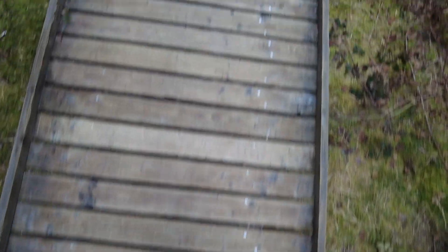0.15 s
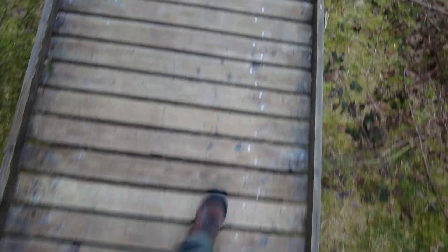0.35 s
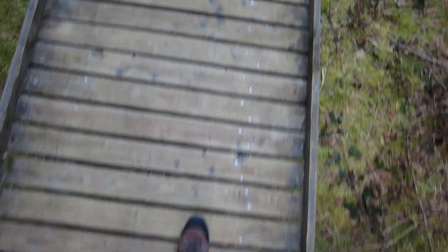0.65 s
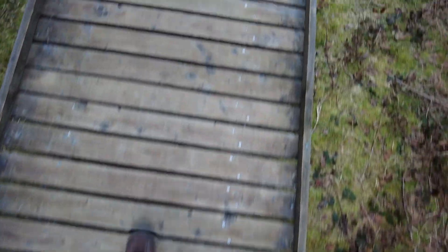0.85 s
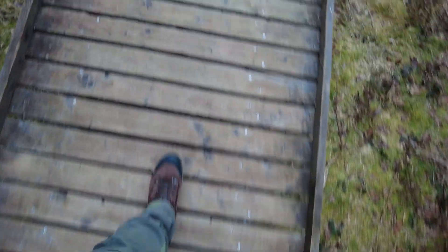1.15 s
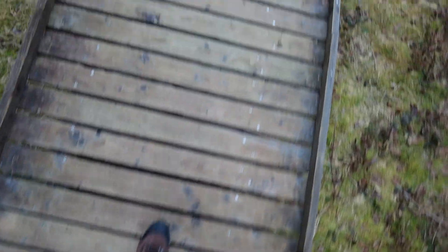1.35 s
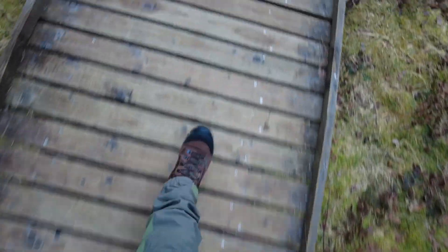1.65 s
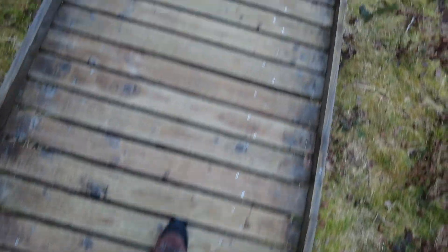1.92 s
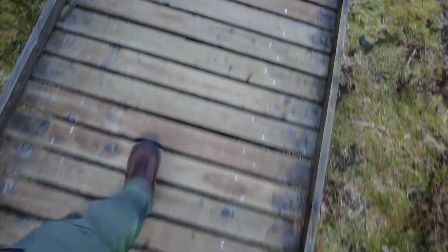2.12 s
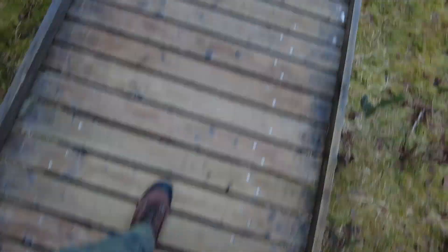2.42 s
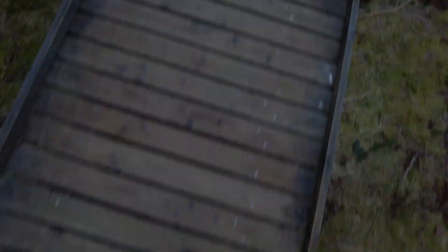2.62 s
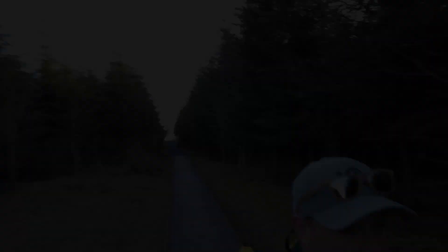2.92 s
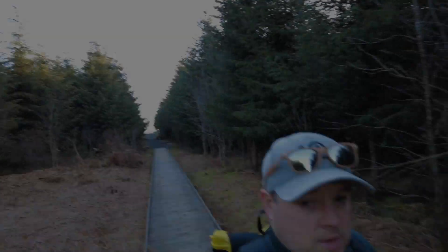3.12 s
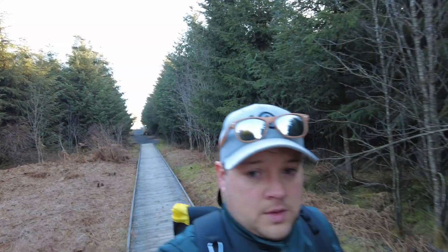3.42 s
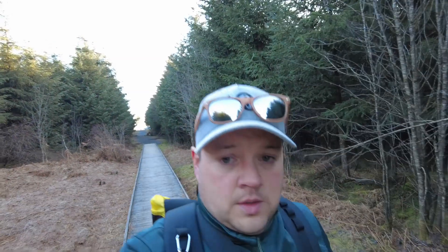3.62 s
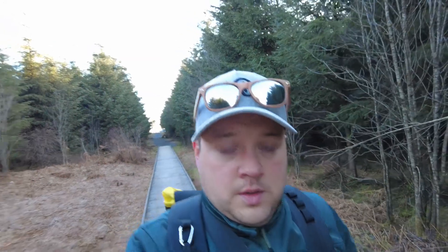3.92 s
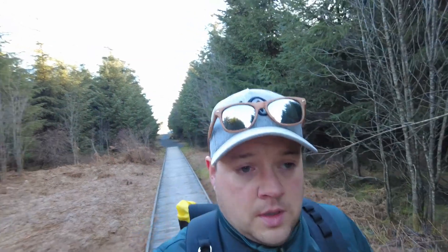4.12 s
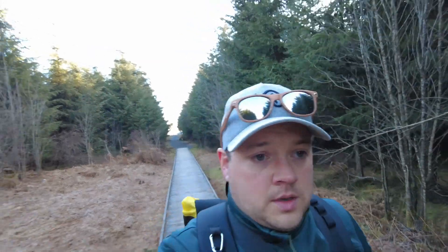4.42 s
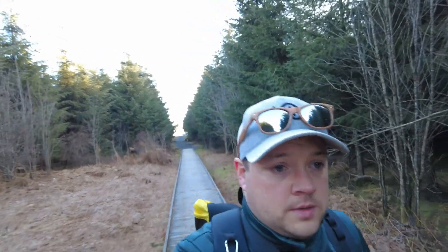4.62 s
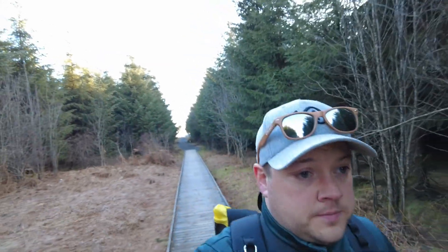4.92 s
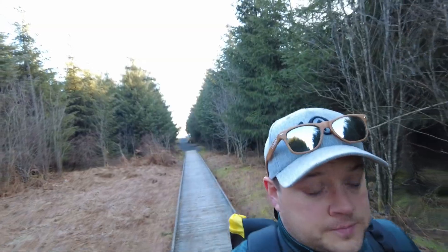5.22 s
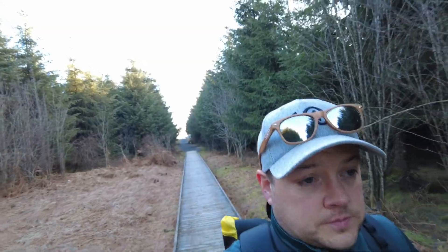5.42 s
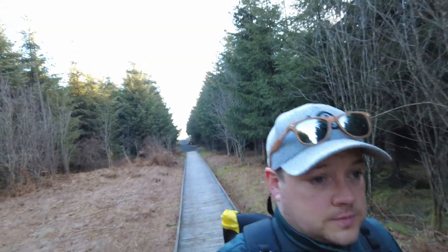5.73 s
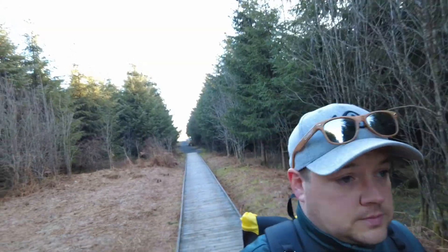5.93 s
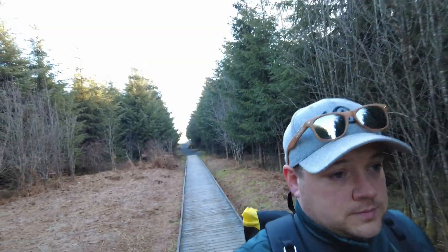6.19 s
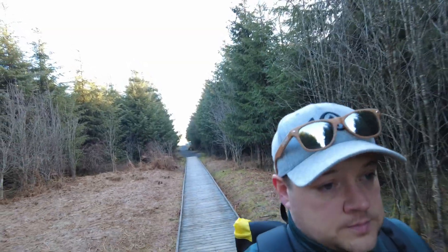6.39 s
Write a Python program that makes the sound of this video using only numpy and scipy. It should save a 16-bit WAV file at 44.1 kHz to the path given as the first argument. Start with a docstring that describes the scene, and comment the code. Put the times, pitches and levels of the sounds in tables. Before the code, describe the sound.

From the start, boots walk along a wooden boardwalk close to the microphone, about one step every half second or so, over a soft hiss of air in the trees. Heels and toes knock the planks and set off low, hollow thumps in the beams. Clothes rustle with each stride, soles scuff, and grit and gear make small clacks. The strongest steps land at about 1.1, 1.8 and 2.4 seconds. At 2.5 seconds a finch gives one faint note. Just before 3 seconds the ring of the boards breaks off, and the steps continue a little lighter, with less rustle. After a few stray notes, the finch sings a swelling trill from about 4.2 seconds, then three slower calls between 4.9 and 5.5 seconds, softly echoing off to one side. A heavier, clattering step comes near 5.9 seconds, and the walking goes on until the end at about 6.5 seconds.

```python
"""Boots tramp along a wooden boardwalk in a quiet wood, heard close up through two microphone ports. From the
start, over a soft hiss of air, heels and toes knock the planks and set the beams swinging, while cloth rustles,
soles scuff and grit and gear clack. At 2.5 s a finch tries its first note; just before 3 s the scene changes:
all ringing and swishing still sounding breaks off, and the steps carry on. From about 4.2 s the finch sings a
swelling trill and three slower calls, smeared by the trees, and the boots tramp on to the end."""
import sys
import numpy as np
from scipy import signal
from scipy.fft import rfft, irfft
from scipy.io import wavfile
from scipy.ndimage import uniform_filter1d

SR = 44100
rng = np.random.default_rng(int(sys.argv[2]) if len(sys.argv) > 2 else 0)


def digitize_waveform(pressure):
    """Quantize a signal to 16-bit integers and store it at the path in sys.argv[1].

    Rows of a 2-D input are taken as channels; values are limited to [-1, 1].
    """
    field = np.atleast_2d(pressure).T
    bounded = np.clip(field, -1, 1)
    quanta = np.round(bounded * 32767).astype(np.int16)
    wavfile.write(sys.argv[1], SR, quanta)


N = 289109
BREAK_S = 2.932  # earlier footfalls and leg swings stop sounding here

# drift of the walker between the ports, scaled by each layer: time_s, left_lag_us
FACING = [(0, -49), (1.5, -40), (2.1, -58), (2.9, -41), (2.95, 18), (4, 48), (6.56, 66)]


def gain_of(db):
    """Decibels to gain."""
    return 10 ** (np.asarray(db) / 20)


def unit_rms(x):
    """Scales to rms 1."""
    return x / np.sqrt(np.mean(x ** 2) + 1e-20)


def curve_at(points, hz):
    """Reads a curve on a log-frequency axis."""
    point_hz, value = np.transpose(points)
    return np.interp(np.log(hz + 1), np.log(point_hz + 1), value)


def facing_lag_us(time_s):
    """The walker's left-port lag at a given time."""
    return np.interp(time_s, *np.transpose(FACING))


def add(mix, start_s, sound):
    """Mixes a sound in at its start time."""
    part = mix[..., round(start_s * SR):][..., :sound.shape[-1]]
    part += sound[..., :part.shape[-1]]


def ring(modes, t, tune, extra_db=0):
    """A struck body: one dying sine for each mode."""
    hz, db, t60 = np.transpose(modes)[:, :, None]
    return (gain_of(db + extra_db - 60 * t / t60) * np.sin(2 * np.pi * hz * tune * t)).sum(0)


def ports(left, right, pan_db, lag_us):
    """Places a sound by a small step in level and arrival time between the ports."""
    hz = np.fft.rfftfreq(len(left), 1 / SR)
    delay_s = 1e-4 + np.array([[lag_us], [-lag_us]]) * 1e-6 / 2
    delayed = rfft([left, right]) * np.exp(-2j * np.pi * hz * delay_s)
    return irfft(delayed, len(left)) * gain_of([[pan_db / 2], [-pan_db / 2]])


def textured_noise(spectrum, level_db, patchy_db, flicker_db):
    """Stereo noise with drifting patches of colour and a broadband flicker."""
    # how alike the two ports sound: frequency_hz, likeness (0 to 1)
    port_likeness = [(60, 0.95), (300, 0.77), (1000, 0.045), (3000, 0.81), (10000, 0.052)]
    frames, hz = N // 128 + 5, np.fft.rfftfreq(512, 1 / SR)[:, None]
    t = np.arange(frames) * 128 / SR
    left_re, left_im, apart_re, apart_im, patches = rng.standard_normal((frames, 257, 5)).T
    patches = unit_rms(uniform_filter1d(uniform_filter1d(patches, size=6, axis=0), size=16, axis=1))
    flicker = rng.exponential(1, frames) - 1
    alike = np.clip(curve_at(port_likeness, hz), 0, 1)
    lag = np.exp(2j * np.pi * hz * 1e-6 * facing_lag_us(t))
    left = left_re + 1j * left_im
    right = alike * left * lag + np.sqrt(1 - alike ** 2) * (apart_re + 1j * apart_im)
    colour = gain_of(curve_at(spectrum, hz) + patchy_db * patches + flicker_db * flicker)
    _, sound = signal.istft(np.array([left, right]) * colour, nperseg=512, noverlap=384)
    return gain_of(level_db) * unit_rms(sound[:, :N])


def low_noise(spectrum, level_db):
    """Shaped noise, nearly the same at both ports."""
    colour = gain_of(curve_at(spectrum, np.fft.rfftfreq(N, 1 / SR)))
    mid, side = irfft(rfft(rng.standard_normal((N, 2)).T) * colour, N)
    return gain_of(level_db) * unit_rms(mid + gain_of(-20) * np.array([side, -side]))


def swing_level_db(layer):
    """Envelope of "cloth" or "soles": a resting murmur plus a rise and fall for each leg swing."""
    # leg swings: peak_s, cloth_db, soles_db
    leg_swings = [(0.01, -40, -38.5), (0.25, -45.5, -38.5), (0.37, -74, -66), (0.48, -43, -67),
                  (0.69, -41.5, -37.5), (0.84, -66, -41.5), (1.142, -38, -35.5), (1.449, -43, -38.5),
                  (1.791, -35, -30), (2.25, -44.5, -40), (2.411, -38.5, -33.5), (2.62, -44, -40),
                  (2.87, -46, -38.5), (3.22, -54, -37.5), (3.77, -49, -39.5), (4.04, -48, -42),
                  (4.29, -48, -42), (4.84, -51.5, -39), (5.39, -47, -34.5), (5.881, -45.5, -31.5),
                  (6.43, -48, -37.5)]
    # murmur between swings, one row before the break and one after: cloth_db, soles_db
    resting = [(-53.5, -45.5), (-54.5, -45.5)]
    column, rise_db_per_s, fall_db_per_s = {"cloth": (0, 57, 42), "soles": (1, 157, 78)}[layer]
    t = np.arange(0, N / SR + .01, .004)
    power = gain_of(np.where(t < BREAK_S, resting[0][column], resting[1][column])) ** 2
    for peak_s, *levels_db in leg_swings:
        slope_db = np.where(t < peak_s, rise_db_per_s * (t - peak_s), fall_db_per_s * (peak_s - t))
        same_side_of_break = (t < BREAK_S) == (peak_s < BREAK_S)
        power += gain_of(levels_db[column] + slope_db) ** 2 * same_side_of_break
    return np.interp(np.arange(N) / SR, t, 10 * np.log10(power))


def air():
    """Air in the trees lays a soft hiss under everything."""
    # colour of the hiss: frequency_hz, density_db
    hiss = [(120, -62), (200, 5.5), (683, -12), (867, -4), (1270, -2), (2290, -3.5), (3070, 0), (3560, -17),
            (4950, -5.5), (15100, -45), (16000, -38)]
    return textured_noise(hiss, level_db=-54.5, patchy_db=5.5, flicker_db=0)


def cloth():
    """Clothes rustle brightly with each swing of a leg."""
    # colour of the rustle: frequency_hz, density_db
    rustle = [(880, -39), (1500, 4.5), (2270, -3), (3150, 0), (3880, -3), (6310, -3), (15100, -15.5),
              (16000, -13.5)]
    return textured_noise(rustle, swing_level_db("cloth"), patchy_db=2, flicker_db=2)


def soles():
    """Soles brush the planks in quick, dull scuffs."""
    # colour of the scuff: frequency_hz, density_db
    scuff = [(88, 2), (150, -12.5), (251, 0), (322, 2), (419, -2), (518, 0), (1100, -6.5), (1340, -3),
             (2300, -16.5), (3500, -18.5), (4550, -17), (7700, -120)]
    return textured_noise(scuff, swing_level_db("soles"), patchy_db=4, flicker_db=0.5)


def deck():
    """Planks rumble and beams sway under the walker's weight between the blows."""
    # weight on the deck: time_s, rumble_db, sway_db
    weight = [(0.0, -25, -51), (0.42, -57, -36.5), (1.26, -50, -41.5), (2.09, -55.5, -40.5),
              (2.46, -53, -40.5), (4.06, -67, -50.5), (5.42, -64, -42), (5.77, -68, -51.5),
              (5.94, -29.5, -43), (6.34, -75, -49.5), (6.55, -51, -44)]
    # colour of the plank rumble: frequency_hz, density_db
    rumble = [(60, -43), (80, 15), (105, 13), (140, -0.5), (200, 3), (300, -36)]
    # colour of the beam sway: frequency_hz, density_db
    sway = [(8, -12), (22, 10), (42, 0), (62, -5.5), (85, -36)]
    time_s, *levels_db = np.transpose(weight)
    rumble_db, sway_db = [np.interp(np.arange(N) / SR, time_s, db) for db in levels_db]
    return low_noise(rumble, rumble_db) + low_noise(sway, sway_db)


def footfalls():
    """Each blow is a short uneven contact that rings the plank, then the weight swings the beam."""
    # heel and toe blows: start_s, knock_db, thump_db, beam_db, struck_hz (before tuning),
    # tuning_ratio, falloff_db_per_octave (around the struck pitch)
    blows = [(0.004, -18, -49, -11.5, 250, 0.98, -8), (0.102, -15, -21.5, -16, 170, 1.11, -10),
             (0.356, -30.5, -45, -50, 330, 0.68, -19), (0.414, -28, -52, -52, 196, 0.46, -11),
             (0.573, -14.5, -21, -15, 165, 0.96, -8), (0.7, -13, -20, -16, 420, 1.14, -3),
             (1.134, -9.5, -21, -7.5, 900, 1.07, -8), (1.152, -14.5, -14, -37, 186, 1.13, -4),
             (1.263, -9, -16, -19, 320, 1.12, -10), (1.74, -16, -23, -42, 198, 1.03, -9),
             (1.771, -7.5, -30, -27, 355, 0.95, -19), (2.3713, -1, -13, -6.5, 794, 1.075, -9),
             (2.493, -17.5, -28, -23, 224, 1.14, -14), (2.615, -23.5, -56, -25.5, 510, 1.27, -19),
             (2.919, -10, -60, -48, 287, 0.95, -3.5), (3.092, -14, -33, -53, 276, 0.93, -7),
             (3.22, -19.5, -40, -52, 337, 0.92, -30), (3.632, -20.5, -20.5, -20.5, 210, 0.93, -3),
             (3.735, -23.5, -32.5, -20, 335, 1.07, -1), (4.212, -17.5, -23.5, -21.5, 283, 1.06, -6),
             (4.321, -23.5, -38, -26, 295, 1.18, -23), (4.519, -26.5, -67, -37, 660, 1.26, -17),
             (4.766, -19, -20, -32, 355, 0.92, -27), (4.881, -26.5, -33.5, -27, 253, 0.9, -7),
             (5.3385, -15.5, -29, -19, 260, 0.95, -3), (5.41, -20, -29, -16.5, 307, 1, 0),
             (5.828, -9.5, -18, -40, 395, 1.07, -21), (5.845, -15.5, -32, -45, 338, 0.99, -12),
             (5.86, -16.5, -25, -36, 264, 1.03, -31), (5.878, -18, -30, -45, 298, 0.8, -9),
             (5.9, -14, -27, -23, 269, 1.03, -5), (5.948, -23.5, -28, -47, 334, 1.3, -9),
             (6.032, -25.5, -35, -51, 237, 0.977, -7), (6.413, -12, -31, -16.5, 180, 1.03, -20),
             (6.51, -21, -23.5, -25, 443, 0.74, -8)]
    # upper plank modes: pitch_hz, level_db, t60_s
    knock_modes = [(140, 4, 0.058), (180, -2, 0.1), (221, -2, 0.15), (264, -3, 0.16), (301, 2.5, 0.042),
                   (355, -1.5, 0.078), (476, 13, 0.024), (603, 4, 0.049), (690, -21, 0.033),
                   (940, -18, 0.017), (1200, 12.5, 0.011), (1670, 10.5, 0.016)]
    # low plank modes: pitch_hz, level_db, t60_s
    thump_modes = [(104.6, 5.5, 0.22), (134.9, 5.5, 0.12), (153.7, 1, 0.13)]
    # beam modes: pitch_hz, level_db, t60_s
    beam_modes = [(33.9, 1.8, 0.2), (42.1, 4.5, 0.29), (52.9, 3.1, 0.15)]
    contact_s, thump_rise_s, beam_rise_s = 0.0147, 0.022, 0.04
    out, t = np.zeros((2, N)), np.arange(SR // 2) / SR
    contact_t = t[:4000]
    for start_s, knock_db, thump_db, beam_db, struck_hz, tune, falloff_db in blows:
        roughness = 0.045 * rng.standard_normal(len(contact_t)) * np.exp(-contact_t / contact_s)
        contact = roughness - (contact_t == 0)
        contact = uniform_filter1d(np.roll(contact, 5), size=10)  # a rubber sole softens the edge
        detune = 1 + 0.052 * rng.standard_normal((len(knock_modes), 1))
        octaves_away = abs(np.log2(np.array(knock_modes)[:, :1] / struck_hz))
        plank = ring(knock_modes, t, tune * detune, falloff_db * octaves_away)
        knock = signal.oaconvolve(plank, contact)[:len(t)]
        knock = gain_of(knock_db) * knock / abs(knock).max()
        knock = ports(knock, knock, pan_db=0.76, lag_us=4 * facing_lag_us(start_s))
        thump = -ring(thump_modes, t, tune) * (1 - np.exp(-t / thump_rise_s))
        beam = ring(beam_modes, t, tune) * (1 - np.exp(-(t / beam_rise_s) ** 2))
        low = gain_of(thump_db) * thump + gain_of(beam_db) * beam
        width = gain_of(-23) * np.outer([1, -1], signal.hilbert(low).imag)  # slight phase spread
        gate = np.clip((BREAK_S - start_s - t) / .004, 0, 1) if start_s < BREAK_S else 1
        add(out, start_s, gate * (knock + low + width))
    return out


def stray_grit(per_s=5, length_ms=6, ring_ms=10):
    """Rows for faint clacks of loose grit: random in time, colour and pitch, as loud as the soles."""
    draws = rng.random((int(per_s * N / SR), 4))
    soles_db = swing_level_db("soles")
    return [(when * N / SR, soles_db[int(when * N)], length_ms, 12 * bright - 6,
             1300 + 2500 * pitch, ring_ms) for when, _, bright, pitch in draws]


def clacks():
    """Grit and gear clack in clusters of tiny impacts: bare treble ticks plus the ring of hard parts."""
    # clacks: start_s, level_db, length_ms, treble_db, struck_hz (rings 4 % flat), ring_t60_ms
    hits = [(0.039, -30, 3.5, 9, 2590, 10), (0.103, -22, 1.1, -26, 1570, 9.1),
            (0.25, -33.5, 41, -7, 2170, 4.1), (0.507, -26.5, 6.2, 1.5, 1990, 37),
            (0.573, -28.5, 2.2, -10, 1424, 40), (0.663, -24.5, 2.3, 6, 1970, 19),
            (0.697, -19.5, 3.6, 8.5, 1550, 8.2), (1.124, -30, 6.4, -8, 1140, 25),
            (1.1332, -5.5, 2.46, -6, 1330, 10.6), (1.209, -30.5, 3, 10, 2400, 10),
            (1.26, -14, 16.4, 7.5, 1705, 30), (1.668, -31.5, 16, -2, 1890, 10),
            (1.767, -16.5, 2.8, -1.5, 1780, 19), (2.412, -26, 24, -1, 1670, 32),
            (2.419, -26.5, 10, 9, 3250, 12), (2.48, -33, 37, 12, 1960, 11), (2.615, -33, 28, -12, 1670, 12),
            (2.737, -36.5, 4.3, 5, 1860, 12), (2.825, -28, 30, 8, 2270, 6.4),
            (2.847, -29.5, 58, 5, 2140, 7.6), (2.891, -13.5, 9.3, 3, 3020, 12),
            (3.2187, -16, 5, -2, 1970, 14), (3.649, -33.5, 13.6, -0.5, 2360, 7.8),
            (3.724, -30, 4.8, 4, 1960, 12), (3.734, -31, 6.7, 5, 2440, 10),
            (3.773, -22.5, 6.1, -5.5, 1760, 28), (3.792, -28.5, 3.6, -5, 2510, 4.5),
            (3.802, -30, 3.9, 2, 1990, 15), (4.021, -19.5, 12, -4.5, 1200, 16),
            (4.927, -35.5, 6.4, -2, 1750, 12), (5.279, -38.5, 16, 7, 1710, 18),
            (5.355, -32, 13, 4, 1820, 11), (5.382, -19, 5.6, 1, 2360, 26), (5.407, -22, 4.8, 0.5, 1705, 55),
            (5.8011, -25, 3.4, 0.5, 1350, 140), (5.822, -14.5, 5.7, 2.5, 2560, 6.3),
            (5.895, -16.5, 4.8, 3, 1747, 10), (6.035, -33.5, 7.5, 3, 2090, 11),
            (6.444, -27, 16, 0.5, 2080, 17)]
    # modes of the hard parts, retuned for each clack: pitch_hz, level_db, t60_s
    gear_modes = [(950, -6, .016), (1200, -1, .014), (1570, 0, .012), (1900, 1, .011), (2340, 2, .009),
                  (2960, 4, .009), (3600, 3, .007), (4650, 4, .006)]
    out, t = np.zeros((2, N)), np.arange(4096) / SR
    tick_highpass = signal.butter(2, 3000, "high", fs=SR)
    tick_lowpass = signal.butter(1, 13000, fs=SR)
    body_highpass = signal.butter(2, 800, "high", fs=SR)
    for start_s, level_db, length_ms, treble_db, struck_hz, ring_ms in hits + stray_grit():
        noise = rng.standard_normal((4, len(t)))
        centre, sides, grain = noise[0], noise[1:3], unit_rms(uniform_filter1d(noise[3], size=40))
        progress = t * 1000 / length_ms
        rise = np.minimum(progress / 0.22, 1)  # long crunches swell, short cracks snap
        crunch = rise * gain_of(-9 * progress ** 2 + 3.5 * grain)
        modes = np.array(gear_modes)
        struck = abs(np.log(modes[:, 0] / struck_hz)).argmin()
        modes[:, 0] *= struck_hz / modes[struck, 0]
        stretch = ring_ms / 1000 / modes[struck, 2]
        modes[struck, 2] *= stretch
        modes[struck, 1] -= 8 * np.log10(stretch)  # a longer ring starts softer
        octaves_away = abs(np.log2(modes[:, :1] / struck_hz))
        gear = ring(modes, t, tune=0.96, extra_db=-9 * octaves_away)
        drive = (centre + .45 * sides) * (crunch + rise * gain_of(-15 - 550 * t))
        body = signal.oaconvolve(drive, gear[None], axes=1)[:, :len(t)]
        body = signal.lfilter(*body_highpass, body) / abs(body).max()
        ticks = (centre + 4.5 * sides) * (crunch + rise * gain_of(-13.5 - 440 * t))
        ticks = signal.lfilter(*tick_lowpass, signal.lfilter(*tick_highpass, ticks))
        clack = body + gain_of(treble_db - 4) * ticks / abs(ticks).max()
        peak_rms = np.sqrt(uniform_filter1d(clack[0] ** 2, size=44).max())  # loudest millisecond
        placed = ports(*clack, pan_db=0.81, lag_us=0.53 * facing_lag_us(start_s))
        add(out, start_s, gain_of(level_db) / peak_rms * placed)
    return out


def whistle(length_s, start_hz, end_hz, level_db):
    """One bird note: a sine gliding straight from one pitch to another."""
    hz = np.linspace(start_hz, end_hz, round(length_s * SR))
    return gain_of(level_db) * np.sin(2 * np.pi * np.cumsum(hz) / SR) * np.sqrt(np.hanning(len(hz)))


def finch():
    """A finch off to one side whistles stray notes, a trill and slower calls; the trees smear them."""
    # single notes: start_s, length_s, start_hz, end_hz, relative_db
    notes = [(2.507, 0.025, 4370, 4780, -45.5), (3.702, 0.27, 2980, 2922, -61.5),
             (3.88, 0.051, 5860, 4500, -57), (4.05, 0.023, 5330, 4780, -48.5),
             (4.175, 0.035, 4720, 3810, -48), (4.264, 0.053, 2455, 2710, -54),
             (4.31, 0.038, 2810, 2470, -61), (4.885, 0.03, 2510, 2670, -50.5),
             (5.637, 0.069, 2490, 2680, -55), (5.712, 0.041, 4300, 5000, -51)]
    # glides of a trill syllable: offset_s, length_s, start_hz, end_hz, relative_db
    syllable = [(-.014, 0.011, 4780, 6060, -14), (-.008, 0.019, 4980, 3330, -1),
                (.008, 0.0197, 3550, 2520, -6.5)]
    # slower calls that end the phrase: start_s, relative_db
    calls = [(4.942, -43.5), (5.172, -43), (5.407, -44.5)]
    # up and down glides of a call: offset_s, length_s, start_hz, end_hz, relative_db
    arch = [(0.0, .042, 2895, 3944, 0.98), (0.061, 0.037, 3400, 2143, 0.045)]
    trill_start_s, trill_step_s, swell_s, wood_t60_s = 4.228, .0732, 0.043, .9
    song = np.zeros(N)
    for start_s, *note in notes:
        add(song, start_s, whistle(*note))
    since_s = trill_step_s * np.arange(9)
    trill = zip(trill_start_s + since_s, -42.5 - 13 * np.exp(-since_s / swell_s))
    for onsets, glides in (trill, syllable), (calls, arch):
        for start_s, level_db in onsets:
            for offset_s, length_s, *ends_hz, glide_db in glides:
                louder, higher = rng.standard_normal(2)  # no two glides are quite alike
                ends_hz = np.multiply(ends_hz, 1 + .035 * higher)
                glide = whistle(length_s, *ends_hz, level_db + glide_db + 2 * louder)
                add(song, start_s + offset_s, glide)
    t = np.arange(SR) / SR
    echoes = rng.standard_normal((3, SR)) * gain_of(-60 * t / wood_t60_s) * np.minimum(t / 0.045, 1)
    echoes = echoes[0] * 0.12 + echoes[1:]  # the ports share only a little of the tail
    reverb = signal.fftconvolve(song[None], echoes / np.linalg.norm(echoes[0]), axes=1)[:, :N]
    return gain_of(7) * (ports(song, song, pan_db=0.15, lag_us=118) + gain_of(1.5) * reverb)


def scene():
    """The air in the trees, the walker on the boardwalk and the finch."""
    return air() + footfalls() + clacks() + cloth() + soles() + deck() + finch()


def record(dry):
    """The left port is a little more open in the mids; peaks clip at full scale; the top is cut off."""
    # shape of the lean to the left: frequency_hz, relative_db
    balance = [(100, 0), (380, 1), (900, 3), (2400, 2), (8000, 1.7), (15000, 0)]
    tilt_db = 0.7 * curve_at(balance, np.fft.rfftfreq(N, 1 / SR))
    coloured = irfft(rfft(dry) * gain_of([tilt_db, -tilt_db]), N)
    lowpass = signal.firwin(511, cutoff=15900, window=("kaiser", 9), fs=SR)
    return signal.oaconvolve(np.clip(coloured, -1, 1), lowpass[None], "same")


dry = scene()
out = record(dry)
digitize_waveform(out)
```